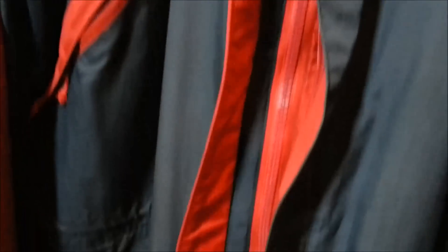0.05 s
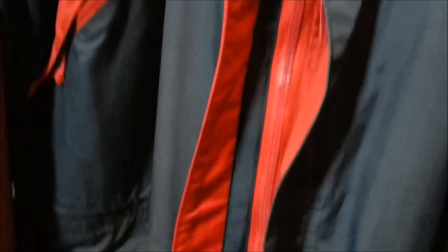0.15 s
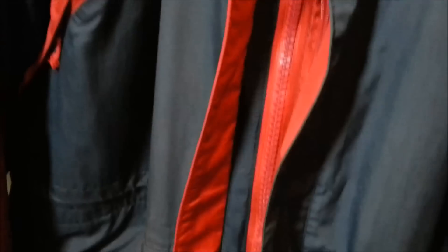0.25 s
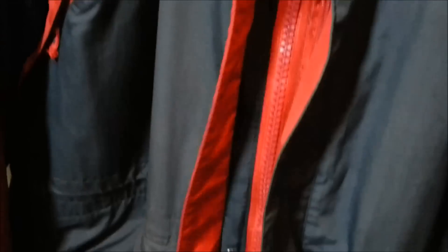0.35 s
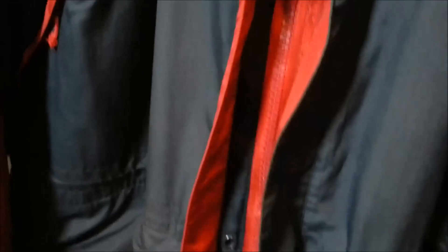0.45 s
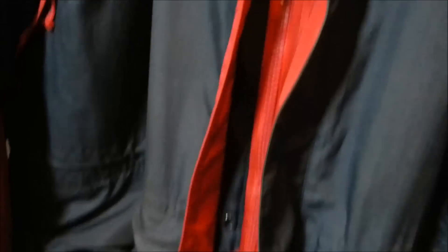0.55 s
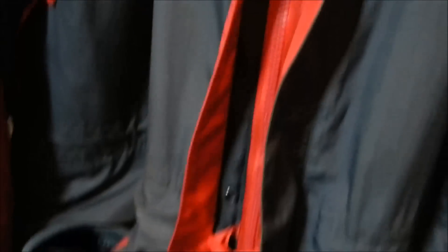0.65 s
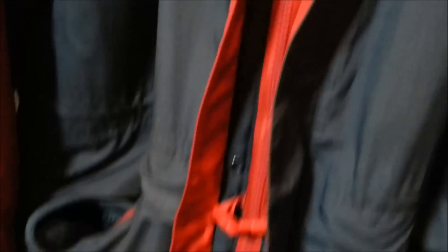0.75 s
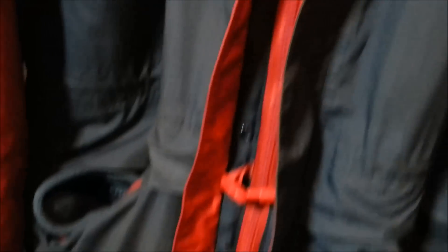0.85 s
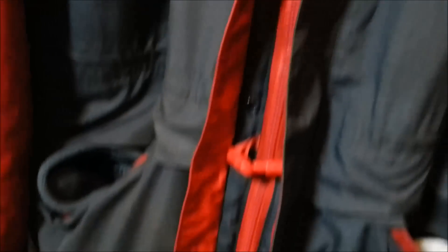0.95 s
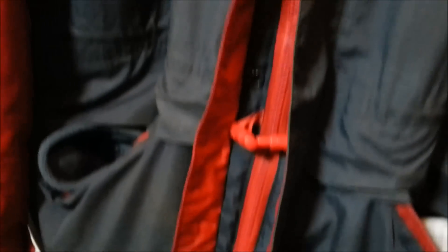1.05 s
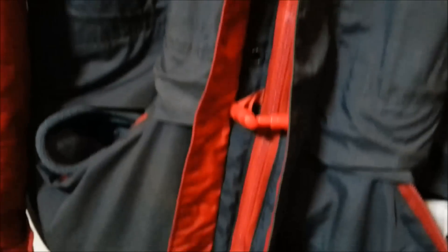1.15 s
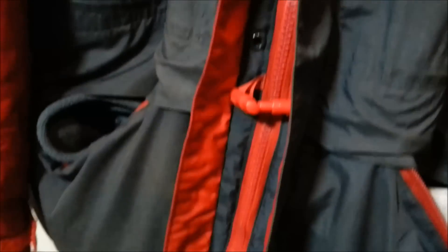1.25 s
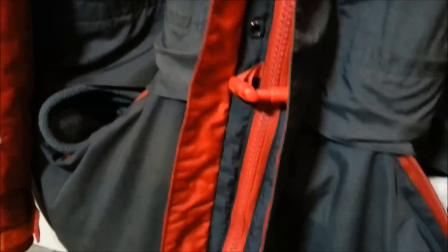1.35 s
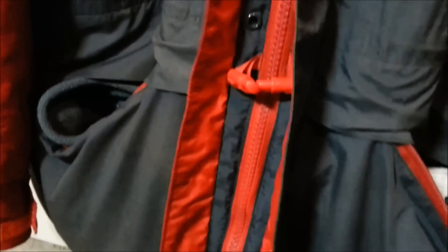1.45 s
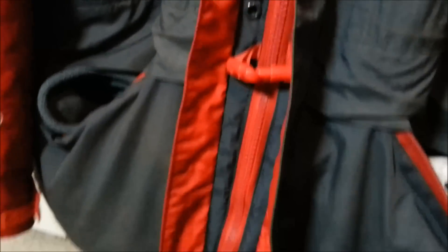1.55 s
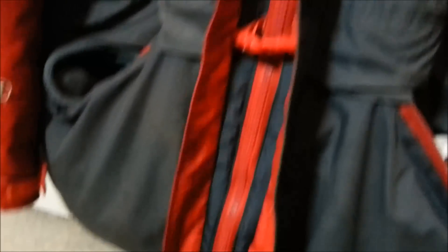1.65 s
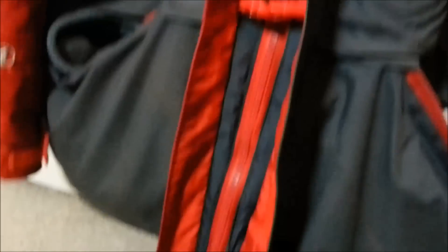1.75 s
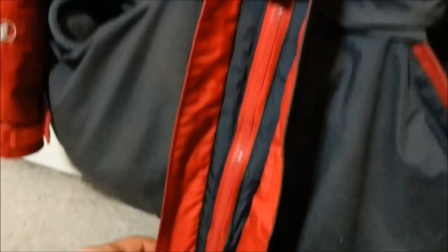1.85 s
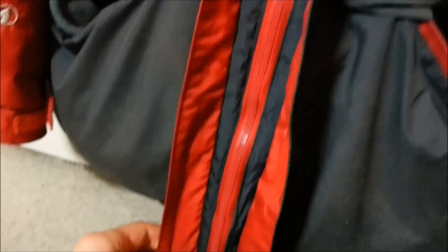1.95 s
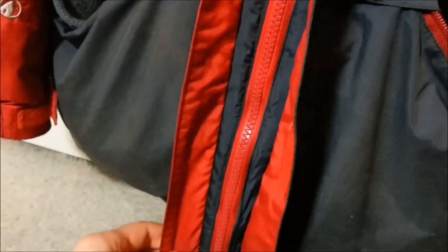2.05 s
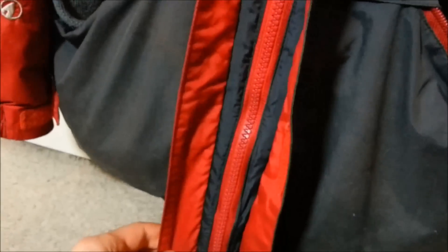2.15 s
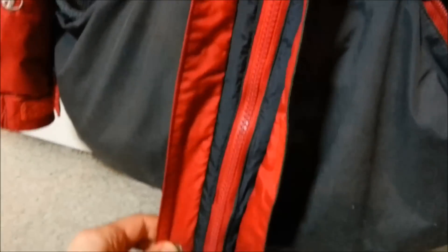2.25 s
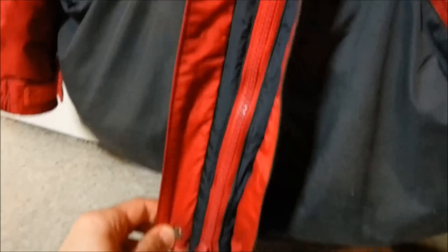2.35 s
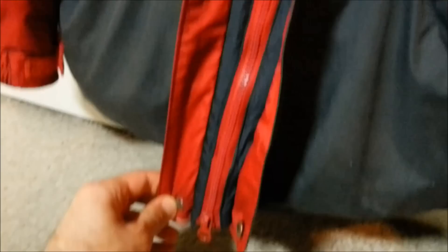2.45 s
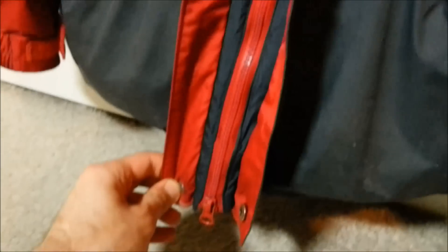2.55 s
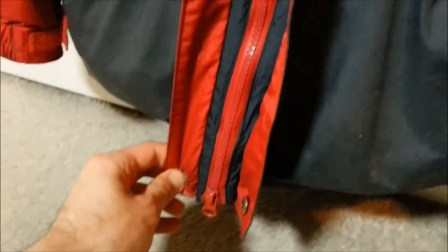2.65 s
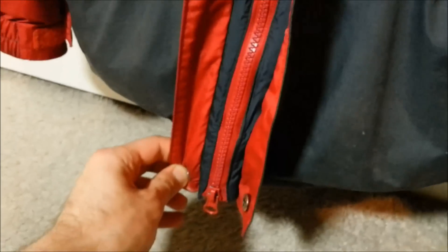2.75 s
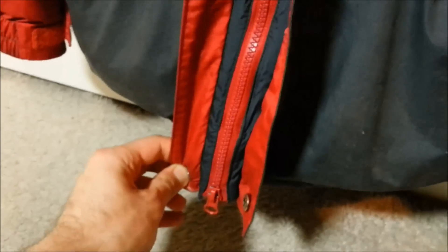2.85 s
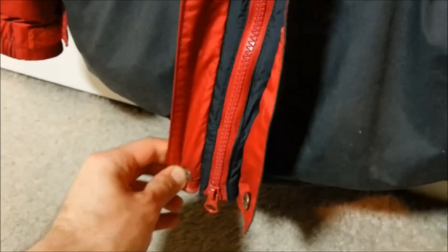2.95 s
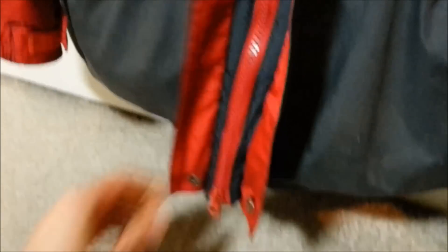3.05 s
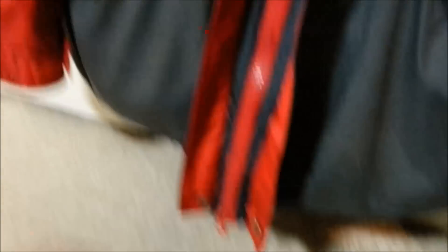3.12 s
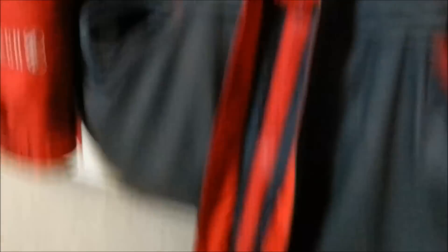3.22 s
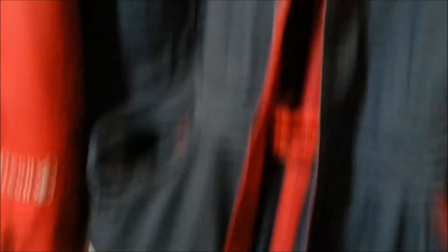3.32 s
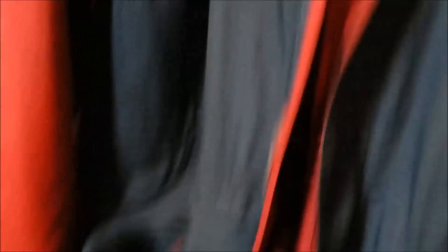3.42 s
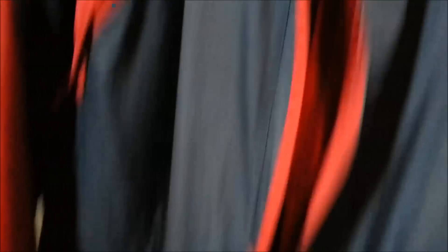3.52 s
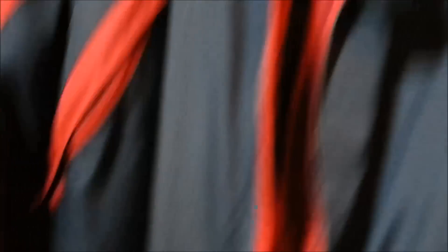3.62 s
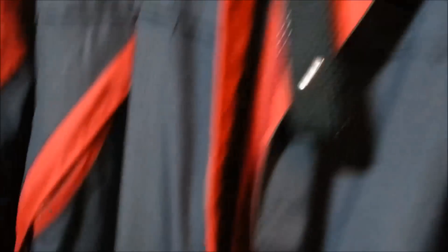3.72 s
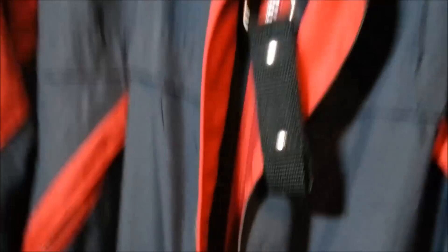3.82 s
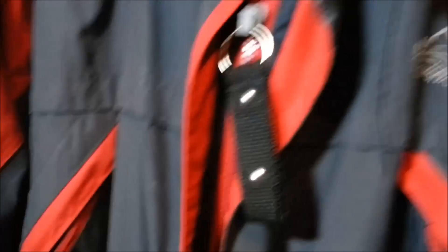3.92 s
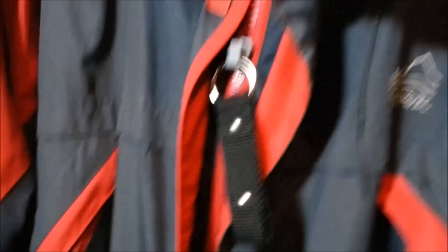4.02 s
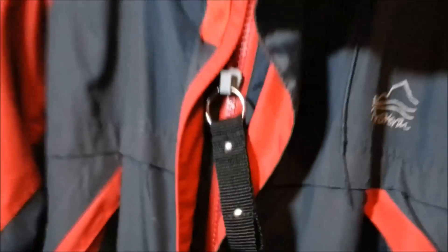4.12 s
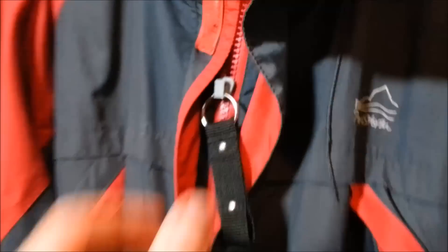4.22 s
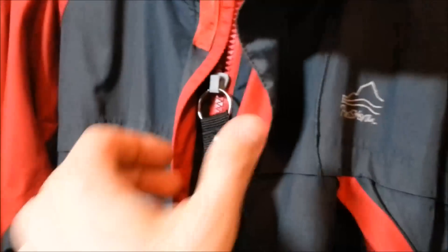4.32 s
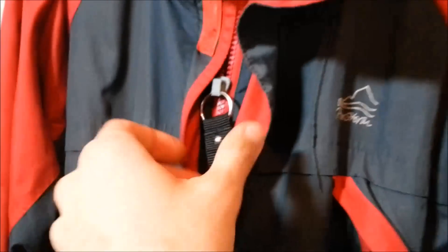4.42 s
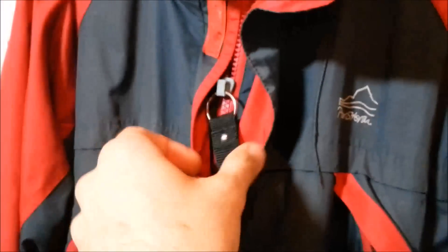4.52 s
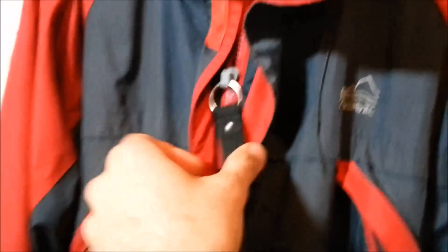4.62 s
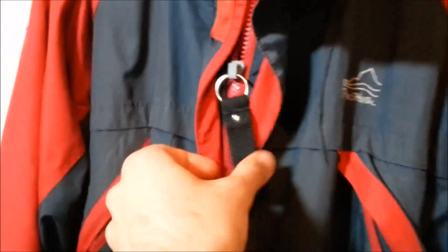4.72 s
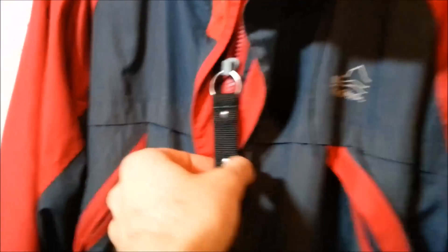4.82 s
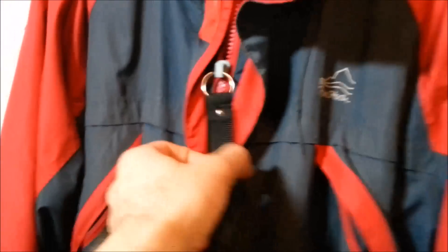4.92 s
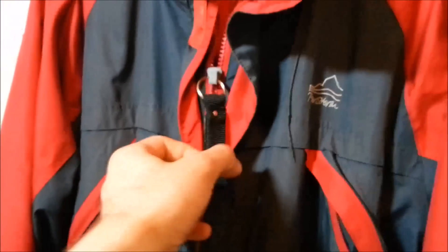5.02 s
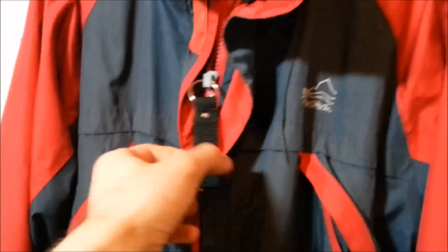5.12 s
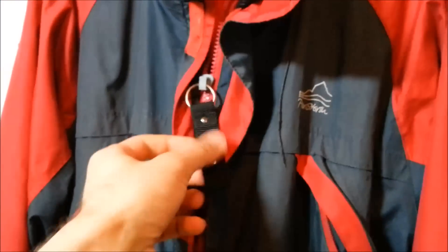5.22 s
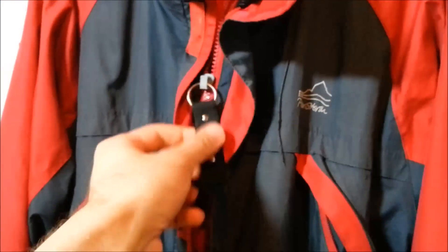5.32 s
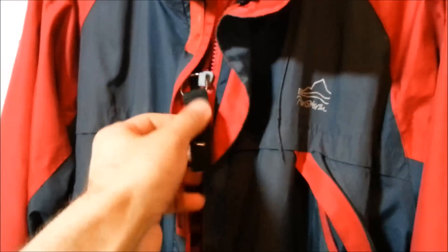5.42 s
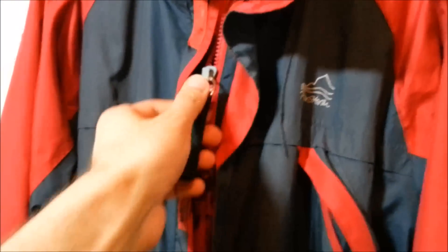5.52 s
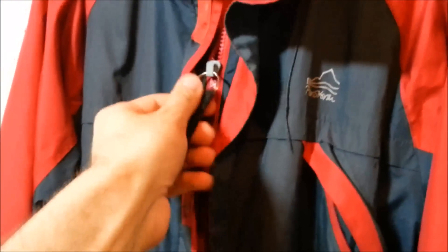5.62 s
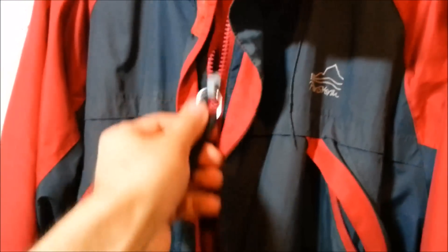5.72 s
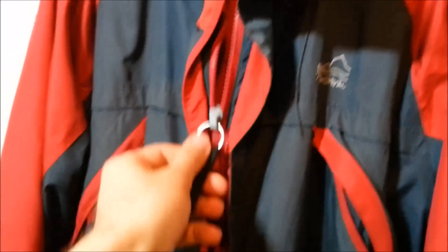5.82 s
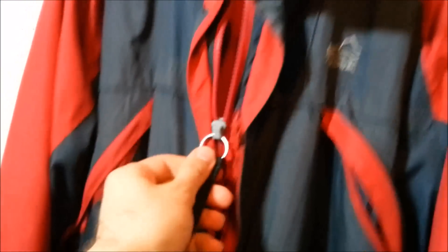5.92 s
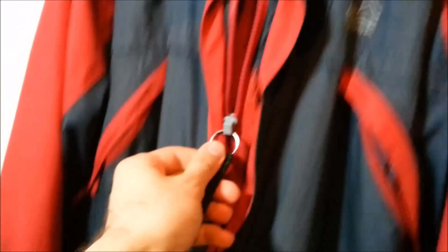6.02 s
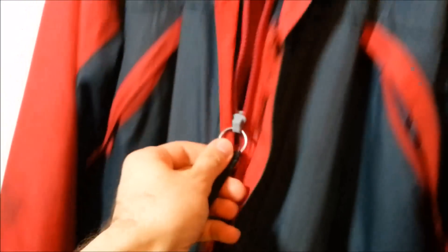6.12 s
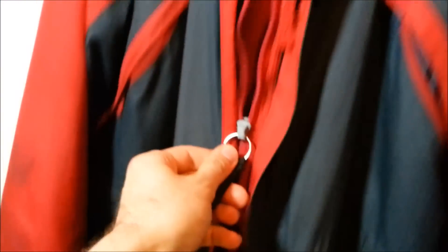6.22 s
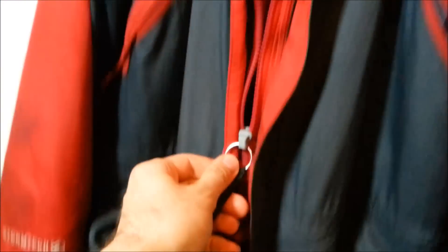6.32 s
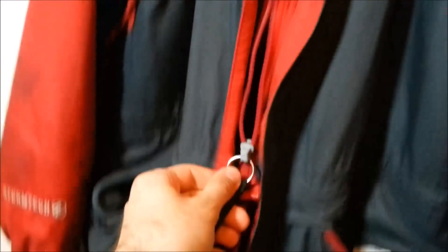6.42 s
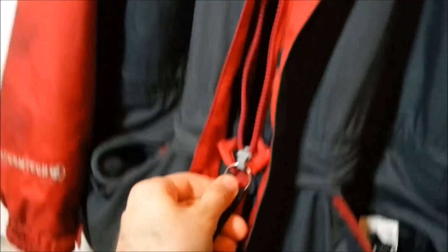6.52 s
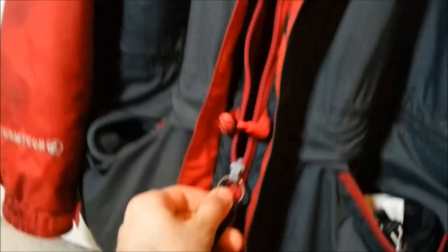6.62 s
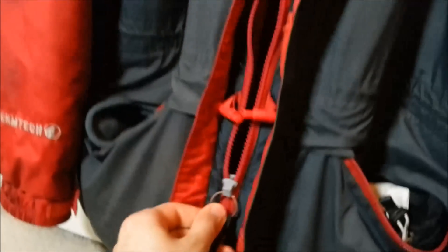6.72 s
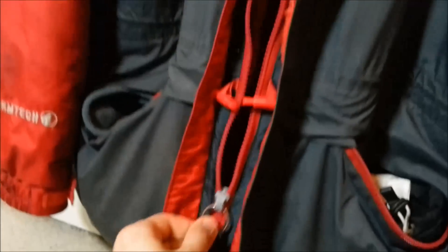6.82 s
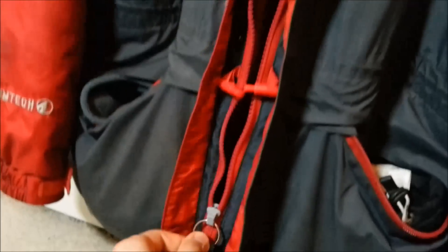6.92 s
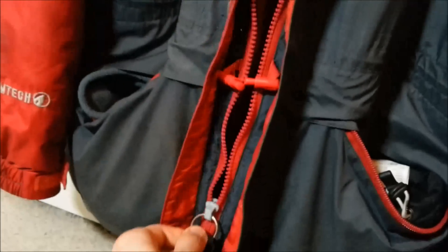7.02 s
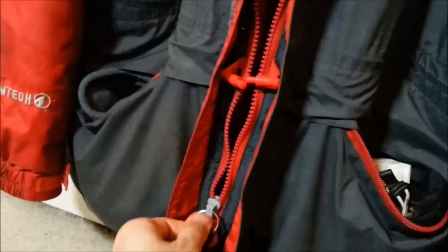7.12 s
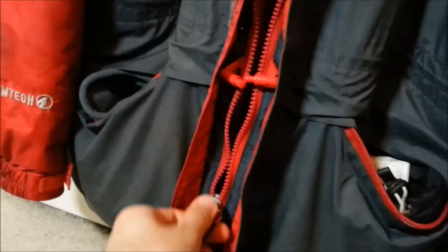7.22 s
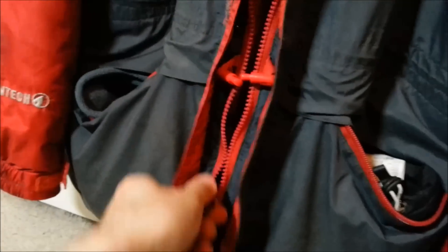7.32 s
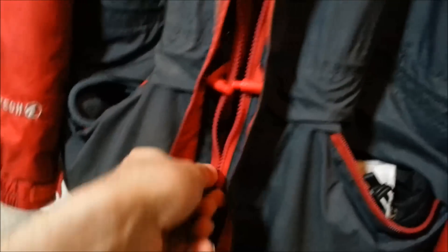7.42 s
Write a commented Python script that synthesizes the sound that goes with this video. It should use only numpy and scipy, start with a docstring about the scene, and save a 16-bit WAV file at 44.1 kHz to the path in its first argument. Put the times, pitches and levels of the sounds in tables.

```python
"""A plastic zip is pulled down a hanging nylon jacket, close by in a small room. The teeth snap and
scrape through the slider, ring the hollow behind it and shake the loose panel into a buzz; the tape
hisses; the slider rattles on the bottom stop. Before the pull, the shell swishes and cloth rubs in
tiny thread slips, a stiff fold scrapes, the panel billows, fingers knock and the metal pull ring clicks.
Two microphone ports hear it all, with early reflections and faint room air."""
import sys
import numpy as np
from scipy import signal
from scipy.fft import rfft, irfft, next_fast_len
from scipy.io import wavfile
from scipy.ndimage import uniform_filter1d

SR = 44100
rng = np.random.default_rng(int(sys.argv[2]) if len(sys.argv) > 2 else 0)


def output_pcm(signal):
    """Save a mono or channel-first signal as 16-bit PCM at the path in sys.argv[1].

    Samples are clipped to [-1, 1] before scaling.
    """
    pcm = np.clip(np.atleast_2d(signal).T, -1, 1) * 32767
    wavfile.write(sys.argv[1], SR, np.round(pcm).astype(np.int16))


N = 328986
TIME_S = np.arange(N) / SR

# slider speed: t/s, tooth-pair rate/Hz
SLIDER_SPEED = [(5.74, 88), (5.9, 102), (5.98, 123.3), (6.1, 136.6), (6.28, 150), (6.37, 145), (6.44, 162),
                (6.49, 158.6), (6.555, 133.9), (6.63, 161), (6.7, 155.1), (6.76, 142.3), (6.81, 118.7),
                (6.86, 145.9), (6.9, 128.8), (6.96, 141), (7.02, 118.2)]
# slider drags or runs light: t/s, length/s, level change/dB
SLIDER_DRAGS = [(5.86, 0.084, 1.8), (5.984, 0.24, -3), (6.253, 0.087, 1), (6.43, 0.06, 1.5),
                (6.819, 0.024, -8)]
# tooth rasp: f/Hz, level/dB
RASP_SPECTRUM = [(200, -22), (410, -3.5), (540, -6.5), (750, -2), (1020, -9.5), (1350, -3.5), (1720, -10),
                 (2170, -4), (2800, -5), (3400, -9), (5000, -13), (9000, -32)]
# tape hiss: f/Hz, level/dB
TAPE_SPECTRUM = [(2000, -8), (3600, 1.5), (5500, -1.5), (7100, 2), (8300, -3), (11000, -7), (14500, -15.5)]
# hollow behind the opening zip: t/s, main f/Hz, level/dB
HOLLOW_TRACK = [(5.78, 2050, -8), (5.9, 2150, 4), (6.12, 2170, -7), (6.3, 2420, -1), (6.48, 2060, -1.5),
                (6.7, 2000, -6), (7.0, 2065, -4)]
# its modes: f/main f, width/Hz, level/dB
HOLLOW_MODES = [(0.295, 90, -21), (0.6, 220, -2.5), (1, 200, 3)]
# front panel: f/Hz, width/Hz, taut level/dB, slack level/dB
PANEL_MODES = [(123, 90, -66.5, -67), (276, 128, -61, -56), (354, 74, -62, -57), (426, 125, -62, -69.5)]
# panel buzz: t/s, level/dB
BUZZ_LEVELS = [(6.22, -76), (6.39, -47), (6.48, -54), (6.57, -60), (6.65, -44), (6.7, -52), (6.76, -44.5),
               (6.83, -50.5), (6.96, -48)]
# hits on the bottom stop: t/s, level/dB, main f/Hz
STOP_HITS = [(7.256, -45, 3800), (7.292, -41.5, 3750), (7.2995, -48, 3630), (7.309, -43.5, 3350),
             (7.357, -44, 3270)]
# other modes of the stop: f/Hz, level/dB
STOP_MODES = [(2080, -12), (4450, -8.5), (6900, -4.5)]
# ring, slider and stud clicks: t/s, level/dB, body offset/dB, ring offset/dB, left minus right/dB
CLICKS = [(1.01, -39, -13, -7, 2.5), (2.1171, -35, -11.5, -2, -3), (2.370, -45.5, -5.5, 0, -2),
          (4.805, -52, -16, -6, -4), (4.955, -56, -8, -4, -2), (5.0462, -36.5, -12.5, -6, 15),
          (5.05, -37, -11, -9, -2), (5.259, -53, 0, -2, 1), (5.4195, -40, -3, -3, -5),
          (5.4265, -42, -9, -6, 8), (5.4415, -38, -7, -13, 0), (5.53, -45.5, -7, -6, -4),
          (5.5703, -38, -8, -1, 0.5), (6.561, -34, -17, -4, 6), (6.5839, -30, -27, -4, -15),
          (6.5918, -28, -28, -10, 23), (6.6075, -27.5, -12.5, -8, -6), (6.622, -25, -26, -2, 0),
          (6.634, -30, -14.5, -8, -1), (6.8481, -35.5, -7, -6, -1), (6.9135, -39.5, -4, -2, -4),
          (7.2153, -43, -7, 10, 1)]
# metal pull ring: f/Hz, level/dB, t60/s
PULL_RING_MODES = [(3900, -22, 0.086), (4730, -12, 0.025), (6900, -8, 0.08), (7550, 2, 0.061),
                   (8030, -20, 0.025)]
# slider against the teeth: f/Hz, level/dB, t60/s
SLIDER_MODES = [(2010, -8, 0.084), (2300, -8, 0.09), (3530, 4, 0.051), (4300, 2, 0.04)]
# hard contact: f/Hz, level/dB
TICK_SPECTRUM = [(1500, -58), (3500, -28), (5000, -3), (7300, 3), (8500, -2), (10500, -5.5), (15000, -16)]
# plastic body: f/Hz, level/dB
CLACK_SPECTRUM = [(150, -3), (400, 0), (1000, -6.5), (1400, -4.5), (2300, -1.5), (4200, -5.5), (6500, -8),
                  (10000, -27)]
# cloth sliding on cloth: start/s, length/s, swish/dB, rub/dB, swell/(dB/s)
JACKET_SHIFTS = [(0.0, 0.67, -50, -91, -15), (0.62, 0.27, -54.5, -66.5, -22),
                 (0.993, 0.36, -59.5, -72.5, -23), (1.432, 0.42, -54, -69.5, 3),
                 (2.436, 0.16, -64, -65.5, -20), (3.084, 0.38, -60, -58, 18), (3.477, 0.075, -59, -51, -25),
                 (3.563, 0.18, -52.5, -49.5, -14), (3.805, 0.22, -63, -52.5, -4),
                 (4.04, 0.12, -63.5, -57.5, -20), (4.128, 0.66, -67, -68.5, -2)]
# fingers on shell and pull strap: t/s, swish/dB, rub/dB, length/s
FINGER_STROKES = [(1.526, -58.5, -75, 0.11), (1.689, -52, -84, 0.085), (1.809, -56, -80, 0.12),
                  (1.946, -62, -90, 0.028), (2.083, -71, -69.5, 0.09), (2.369, -58.5, -62, 0.056),
                  (3.129, -52.5, -79, 0.044), (4.626, -63.5, -92, 0.013), (4.831, -55, -55.5, 0.026),
                  (4.89, -61, -64, 0.056), (4.965, -62.5, -60.5, 0.032), (5.007, -57, -65, 0.035),
                  (5.042, -58, -57, 0.023), (5.152, -51.5, -65.5, 0.083), (5.287, -61.5, -68.5, 0.13),
                  (5.368, -63.5, -73, 0.029), (5.417, -60.5, -58.5, 0.044), (5.551, -57.5, -60.5, 0.069),
                  (5.682, -64.5, -67, 0.16), (7.3, -64, -57, 0.043), (7.46, -63, -65, 0.029)]
# smooth nylon: f/Hz, level/dB
SWISH_SPECTRUM = [(400, -10), (900, -12), (1350, -8.5), (1750, -11.5), (2200, -4.5), (2800, -7.5),
                  (4300, -3.5), (5700, -3.5), (7100, 3.5), (8300, -3), (10500, -7), (14500, -14.5)]
# coarse cloth: f/Hz, level/dB
RUB_SPECTRUM = [(150, -1), (255, 2.5), (380, 6.5), (550, 4.5), (780, 2), (1020, 1), (1450, 3), (1950, 3.5),
                (2300, 3), (3000, 2), (4300, -7.5), (8000, -39)]
# loose folds: f/Hz, level/dB
FLAP_SPECTRUM = [(50, -13), (90, -1), (140, 6), (190, -11.5), (245, 3.5), (320, -5.5), (450, 3.5),
                 (650, -14), (1100, -12), (2500, -27.5)]
# stiff fold scraping: t/s, length/s, level/dB, ring f/Hz
FOLD_SCRAPES = [(3.19, 0.14, -61.5, 1530), (3.509, 0.09, -51.5, 1504), (3.94, 0.26, -55, 1410)]
# its modes: f/ring f, width/Hz, level/dB
FOLD_MODES = [(0.44, 300, -5.5), (1, 340, 0.5), (1.92, 500, -7.5)]
# finger and fold knocks: t/s, level/dB
SOFT_KNOCKS = [(0.295, -53), (1.333, -49.5), (1.755, -48), (2.035, -47.5), (2.718, -54), (2.764, -45),
               (4.369, -59), (5.054, -53.5), (7.283, -50)]
# soft knock: f/Hz, level/dB
KNOCK_SPECTRUM = [(40, -11), (90, -2), (300, 2), (500, -0.5), (900, -12.5), (2200, -15), (4000, -26),
                  (9000, -31.5)]
# hand on the microphone case: t/s, level/dB
CASE_BUMPS = [(2.765, -55), (3.28, -57), (3.969, -38)]
# room air: f/Hz, level/dB
AIR_SPECTRUM = [(30, -50.5), (132, 2.5), (176, -5), (281, -18.5), (374, 4.5), (415, -31), (735, -2.5),
                (978, -28.5), (2190, -14.5), (7060, -23.5), (15000, -24)]
# hand, wall and floor echoes: left delay/ms, right delay/ms, level/dB
REFLECTIONS = [(4.1, 5.7, -26.5), (7.2, 9, -25), (13.6, 14.9, -16.5)]
# diffuse sound at the two ports: f/Hz, correlation
PORT_CORRELATION = [(60, -0.97), (130, 0.9), (290, 0.85), (640, 0.6), (1400, 0.12), (3000, -0.19),
                    (6000, 0.0023)]
# port imbalance: f/Hz, left minus right/dB
PORT_BALANCE = [(60, 0), (150, 5.5), (400, 2.5), (800, 4.5), (1500, 8), (3000, 9), (4300, 5), (5500, -0.5),
                (7000, -13), (8500, -1.5), (11000, 1), (15000, 1.5)]


def zip_run(scrape_s=0.0074, snap_db=-5):
    """Teeth snap and scrape through the slider; tape hiss and panel pulse at the tooth rate."""
    rasp_gain, hiss_gain, moving = pull()
    pair_hz = np.interp(TIME_S, *np.transpose(SLIDER_SPEED)) * (1 + 0.03 * drift(45))
    pairs = np.cumsum(pair_hz) / SR
    snaps = tooth_snaps(pairs)
    snap_tails = signal.lfilter([1], [1, -np.exp(-1 / (scrape_s * SR))], snaps)
    pressure = unit_rms(np.sqrt(snap_tails + 1e-9))
    scrape = unit_rms(pressure * friction(slips_per_s=11000, spread_db=2) + undb(snap_db) * snaps)
    rasp = room(rasp_gain * scrape, wet_db=2, lag_ms=0.13, t60_s=0.061)
    rasp = undb(2.5) * colour(rasp, RASP_SPECTRUM)
    cavity = hollow(rasp)
    hiss = hiss_gain * pressure * friction(slips_per_s=14000, spread_db=3.5)
    tape = undb(0.04) * colour(room(hiss, wet_db=8, lag_ms=0.18, t60_s=0.064), TAPE_SPECTRUM)
    panel = moving * (panel_drum(snaps) + panel_buzz(pairs))
    return rasp + cavity + tape + direct(panel, lag_ms=0.1)


def pull(start_s=5.752, stop_s=7.012, nearest_s=6.31, gap_m=0.21, tooth_pitch_m=0.0035):
    """Rasp, hiss and motion gains: rasp fades as the zip opens, hiss grows with speed and nearness."""
    fade_db_per_s, cruise_hz = 3.5, 140
    pair_hz = np.interp(TIME_S, *np.transpose(SLIDER_SPEED))
    moving = ease(start_s, 0.097) * (1 - ease(stop_s, 0.077))
    travel_m = tooth_pitch_m * np.cumsum(pair_hz) / SR
    nearness = gap_m / np.hypot(gap_m, travel_m - np.interp(nearest_s, TIME_S, travel_m))
    drag_db = sum(db * hump(t_s, length_s) for t_s, length_s, db in SLIDER_DRAGS)
    rasp = undb(-47.5 - fade_db_per_s * (TIME_S - start_s) + drag_db)
    hiss = undb(-44 + drag_db) * nearness * (pair_hz / cruise_hz) ** 0.14
    return moving * rasp, moving * hiss, moving


def tooth_snaps(pairs, jitter=0.075, scatter_db=2.5, weak_row_db=-12):
    """Teeth of the two rows snap out of the slider in turn, one row softer."""
    tooth = np.arange(1, int(2 * pairs[-1]) - 1)
    late, size = rng.standard_normal((len(tooth), 2)).T
    at = np.searchsorted(pairs, (tooth + jitter * late) / 2)
    pulses = np.zeros(N)
    pulses[np.minimum(at, N - 1)] = undb(scatter_db * size + weak_row_db * (tooth % 2))
    return unit_rms(pulses)


def hollow(rasp):
    """The rasp rings the hollow behind the zip, which changes shape as its cloth walls tremble."""
    t_s, track_hz, track_db = np.transpose(HOLLOW_TRACK)
    main_hz = np.interp(TIME_S, t_s, track_hz) * (1 + 0.03 * drift(25))
    level_db = np.interp(TIME_S, t_s, track_db)
    return sum(undb(level_db + db) * resonance(rasp, ratio * main_hz, width_hz)
               for ratio, width_hz, db in HOLLOW_MODES)


def panel_drum(snaps, waist_s=6.57, crossing_s=0.2):
    """The panel takes up the tooth beat unevenly; slack below the waist cord, it drums lower, louder."""
    push = snaps * (1 + 0.43 * drift(50)) + rng.standard_normal(N)
    slack = ease(waist_s, crossing_s)
    return sum(undb(taut_db + (slack_db - taut_db) * slack) * cloth_mode(push, hz, width_hz)
               for hz, width_hz, taut_db, slack_db in PANEL_MODES)


def panel_buzz(pairs, flicker_db=2.5):
    """Both tooth rows shake the loose panel into one tone at twice the pair rate."""
    level_db = np.interp(TIME_S, *np.transpose(BUZZ_LEVELS)) + flicker_db * drift(40)
    return undb(level_db) * np.sin(2 * np.pi * 2 * pairs)


def bottom_stop(main_db=-3, ring_t60_s=0.025, scatter=0.04):
    """The slider rattles on the stop: clack, tick and a metal ring that varies with the contact point."""
    t = TIME_S[:SR // 8]
    metal = np.zeros(N)
    for t_s, hit_db, main_hz in STOP_HITS:
        modes = [(main_hz, main_db)]
        modes += [(hz * (1 + scatter * rng.standard_normal()), db) for hz, db in STOP_MODES]
        tone = sum(undb(db) * np.sin(2 * np.pi * (hz * t + rng.random())) for hz, db in modes)
        tone *= decay(t, ring_t60_s)
        start = int(t_s * SR)
        metal[start:start + len(t)] += undb(hit_db) * tone[:N - start]
    times_s, levels_db, _ = np.transpose(STOP_HITS)
    contact = room(bursts(times_s, levels_db, t60_s=0.017), wet_db=1.5, lag_ms=0.1, t60_s=0.15)
    clack = undb(11.5) * colour(contact, CLACK_SPECTRUM)
    tick = undb(3) * colour(contact, TICK_SPECTRUM)
    return direct(metal, lag_ms=0) + clack + tick


def clicks():
    """Hard contacts tick, ring the pull ring and slider, and clack the plastic behind them."""
    t_s, db, body_db, ring_db, pan_db = np.transpose(CLICKS)
    contact = room(bursts(t_s, db, t60_s=0.0068), wet_db=-5, lag_ms=0.16, t60_s=0.21)
    tick = undb(13) * colour(contact, TICK_SPECTRUM)
    pull_ring = undb(2.5) * ringing(t_s, db + ring_db, PULL_RING_MODES)
    slider = undb(19.5) * ringing(t_s, db + body_db, SLIDER_MODES)
    body = room(bursts(t_s, db + body_db, t60_s=0.02), wet_db=-1, lag_ms=0.2, t60_s=0.2)
    clack = undb(17.5) * colour(body, CLACK_SPECTRUM)
    left_db = np.interp(TIME_S, t_s, pan_db) / 2
    return (tick + pull_ring + slider + clack) * undb([left_db, -left_db])


def cloth(weave_hz=4200, weave_width_hz=770, settle_db_per_s=1.06):
    """Nylon swishes, its weave sings under fingers, coarse cloth rubs, loose folds flap and settle."""
    finger_swish, finger_rub = finger_strokes()
    shell_swish, shell_rub = jacket_shifts()
    swish = (shell_swish + finger_swish) * friction(slips_per_s=16000, spread_db=2.5)
    rub = (shell_rub + finger_rub) * friction(slips_per_s=12000, spread_db=2)
    stir = undb(-65.5 - settle_db_per_s * TIME_S) + undb(-11) * shell_rub
    flap = stir * friction(slips_per_s=3800, spread_db=2.5)
    grip = undb(drift(45))  # cloth catches and lets go
    swish = room(swish * grip, wet_db=9.5, lag_ms=0.18, t60_s=0.034)
    nylon = undb(3.5) * colour(swish, SWISH_SPECTRUM)
    pressed = finger_swish / (shell_swish + finger_swish + 1e-9)
    weave = undb(-4) * pressed * resonance(nylon, weave_hz * (1 + 0.13 * drift(12)), weave_width_hz)
    rub = room(rub * grip, wet_db=8, lag_ms=0.03, t60_s=0.13)
    coarse = undb([[1.8], [-0.2]]) * colour(rub, RUB_SPECTRUM)
    flap = room(flap * undb(drift(17)), wet_db=3.5, lag_ms=0.05, t60_s=0.075)
    folds = undb(-0.5) * colour(flap, FLAP_SPECTRUM)
    return nylon + weave + coarse + folds


def finger_strokes(release_s=0.015):
    """Swish and rub gains: each stroke swells and trails off."""
    swish, rub = np.zeros((2, N))
    for t_s, swish_db, rub_db, length_s in FINGER_STROKES:
        release = np.exp(-np.maximum(TIME_S - t_s - length_s / 5, 0) / release_s)
        shape = ease(t_s - length_s / 2, length_s) * release
        swish += undb(swish_db) * shape
        rub += undb(rub_db) * shape
    return swish, rub


def jacket_shifts(rise_s=0.077, release_s=0.038):
    """Swish and rub gains: each shift sets in, swells or fades steadily, and dies away."""
    swish, rub = np.zeros((2, N))
    for start_s, length_s, swish_db, rub_db, swell_db_per_s in JACKET_SHIFTS:
        swell = undb(swell_db_per_s * np.clip(TIME_S - start_s, 0, length_s))
        release = np.exp(-np.maximum(TIME_S - start_s - length_s, 0) / release_s)
        shape = ease(start_s, rise_s) * swell * release
        swish = np.hypot(swish, undb(swish_db) * shape)
        rub = np.hypot(rub, undb(rub_db) * shape)
    return swish, rub


def fold_scrapes(wander=0.061):
    """A stiff fold jerks over cloth and rings hollow at a wandering pitch."""
    force = sum(undb(db) * hump(t_s, length_s) for t_s, length_s, db, _ in FOLD_SCRAPES)
    slips = force * undb(2.2 * drift(60)) * friction(slips_per_s=2500, spread_db=1.5)
    slips = room(slips, wet_db=1.5, lag_ms=0, t60_s=0.084)
    times_s, _, _, ring_hz = np.transpose(FOLD_SCRAPES)
    pitch_hz = np.interp(TIME_S, times_s, ring_hz) * (1 + wander * drift(22))
    return sum(undb(db) * cloth_mode(slips, ratio * pitch_hz, width_hz)
               for ratio, width_hz, db in FOLD_MODES)


def panel_billow():
    """The loose front panel swings and flutters low."""
    swell = undb(-55.5) * hump(centre_s=3.95, length_s=0.2)
    flutter = cloth_mode(rng.standard_normal(N), hz=251, width_hz=81)
    return direct(swell * flutter, lag_ms=0.05)


def knocks(boom_hz=56, boom_t60_s=0.3):
    """Fingers and folds knock softly; the hand bumps the microphone case, which booms briefly."""
    soft = room(bursts(*np.transpose(SOFT_KNOCKS), t60_s=0.039), wet_db=4, lag_ms=0.05, t60_s=0.14)
    t_s, db = np.transpose(CASE_BUMPS)
    bumps = room(bursts(t_s, db, t60_s=0.058), wet_db=-12, lag_ms=0.03, t60_s=0.76)
    thud = undb(17.5) * colour(bumps, [(20, -25), (55, -1), (100, 3), (190, -20), (800, -54)])
    boom = undb(14) * ringing(t_s, db, [(boom_hz, 0, boom_t60_s)])
    return undb(13.5) * colour(soft, KNOCK_SPECTRUM) + undb([[-7], [0]]) * (boom + thud)


def room_air():
    """Faint steady air."""
    return undb(-69) * colour(diffuse(), AIR_SPECTRUM)


def friction(slips_per_s, spread_db):
    """Dense tiny slips, a few much larger than the rest."""
    slips = (rng.random(N) < slips_per_s / SR) * rng.standard_normal(N)
    size_db = spread_db * np.minimum(rng.exponential(size=N), 2 * np.pi)
    return unit_rms(slips * undb(size_db))


def bursts(times_s, levels_db, t60_s):
    """A short crunch of contact noise at each time."""
    out = np.zeros(N)
    t = TIME_S[:SR // 8]
    for t_s, db in zip(times_s, levels_db):
        burst = rng.standard_normal(len(t)) * decay(t, t60_s)
        burst *= np.sqrt(t60_s * SR / np.log(1000) / 20) / np.linalg.norm(burst)  # peak near 1
        start = int(t_s * SR)
        out[start:start + len(t)] += undb(db) * burst[:N - start]
    return out


def ringing(times_s, levels_db, modes):
    """Sharp blows ring damped modes."""
    blows = np.zeros(N)
    blows[(times_s * SR).astype(int)] = undb(levels_db)
    t = TIME_S[:SR // 8]
    tone = sum(undb(db) * np.sin(2 * np.pi * hz * t) * decay(t, t60_s) for hz, db, t60_s in modes)
    drive = room(blows, wet_db=-8.5, lag_ms=0.12, t60_s=0.17)
    return signal.oaconvolve(drive, tone[None] / np.linalg.norm(tone), axes=1)[:, :N]


def cloth_mode(push, hz, width_hz):
    """Steep cloth resonance, about as strong as its broadband push."""
    return np.sqrt(SR / width_hz) * resonance(resonance(push, hz, width_hz), hz, width_hz)


def resonance(x, hz, width_hz):
    """One resonance, gain 1 at its centre, which may move."""
    turn = np.exp(2j * np.pi * np.cumsum(hz * np.ones(N)) / SR)
    pole = np.exp(-np.pi * width_hz / SR)
    return 2 * np.real(turn * signal.lfilter([1 - pole], [1, -pole], x * turn.conj()))


def colour(x, spectrum, size=4096):
    """Minimum-phase stereo filter of unit energy; spectrum: f/Hz, level/dB."""
    cepstrum = irfft(np.log(undb(log_interp(spectrum, np.fft.rfftfreq(size, 1 / SR)))))
    cepstrum[1:size // 2] *= 2
    cepstrum[size // 2 + 1:] = 0
    response = irfft(np.exp(rfft(cepstrum)))
    return signal.oaconvolve(x, response[None] / np.linalg.norm(response), axes=1)[:, :N]


def room(x, wet_db, lag_ms, t60_s):
    """Direct sound plus a diffuse wash: the room fills with energy and drains."""
    pole = np.exp(-2 * np.log(1000) / (t60_s * SR))
    energy = signal.lfilter([1 - pole], [1, -pole], x ** 2 + 1e-18)
    wash = undb(wet_db) * np.sqrt(energy) * diffuse()
    return (direct(x, lag_ms) + wash) / np.sqrt(1 + undb(2 * wet_db))


def direct(x, lag_ms):
    """Straight path; the left port lags."""
    return np.array([np.roll(x, round(lag_ms * SR / 1000)), x])


def diffuse():
    """Stereo noise, correlated like sound from all directions at the two ports."""
    size = next_fast_len(N, real=True)
    mid, side = rfft(rng.standard_normal((2, size)))
    correlation = np.clip(log_interp(PORT_CORRELATION, np.fft.rfftfreq(size, 1 / SR)), -1, 1)
    mid *= np.sqrt((1 + correlation) / 2)
    side *= np.sqrt((1 - correlation) / 2)
    return irfft([mid + side, mid - side], size)[:, :N]


def drift(rate_hz):
    """Smooth random drift, rms 1."""
    hold = int(SR / rate_hz)
    steps = np.repeat(rng.standard_normal(N // hold + 1), hold)
    return unit_rms(uniform_filter1d(steps, hold)[:N])


def ease(centre_s, length_s):
    """Smooth step from 0 to 1."""
    return 0.5 + 0.5 * np.sin(np.pi * np.clip((TIME_S - centre_s) / length_s, -0.5, 0.5))


def hump(centre_s, length_s):
    return np.exp(-(2 * (TIME_S - centre_s) / length_s) ** 2)


def decay(t_s, t60_s):
    return np.exp(-np.log(1000) * t_s / t60_s)


def log_interp(points, hz):
    points_hz, values = np.transpose(points)
    return np.interp(np.log(hz + 1), np.log(points_hz), values)


def unit_rms(x):
    return x / np.sqrt(np.mean(x ** 2))


def undb(db):
    return 10 ** (np.asarray(db) / 20)


def scene():
    """Jacket sounds, their echoes off nearby surfaces, and room air."""
    near = cloth() + fold_scrapes() + panel_billow() + zip_run() + clicks() + bottom_stop() + knocks()
    out = near + room_air()
    for left_ms, right_ms, db in REFLECTIONS:
        for port, delay_ms in enumerate((left_ms, right_ms)):
            out[port] += undb(db) * np.pad(near[port], (round(delay_ms * SR / 1000), 0))[:N]
    return out


def record(dry):
    """Each port has its own colour; the top is cut steeply."""
    top_hz = 14750
    left_db = log_interp(PORT_BALANCE, np.fft.rfftfreq(N, 1 / SR)) / 2
    gains = undb([left_db, -left_db])
    heard = irfft(rfft(dry) * gains / np.sqrt(np.mean(gains ** 2, axis=0)), N)
    return signal.sosfilt(signal.ellip(10, 0.2, 80, top_hz, fs=SR, output="sos"), heard)


dry = scene()
out = record(dry)
output_pcm(out)
```